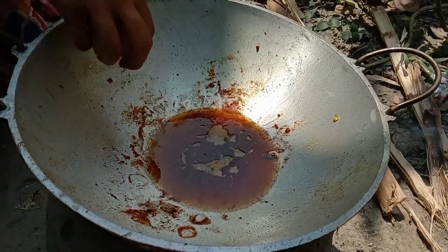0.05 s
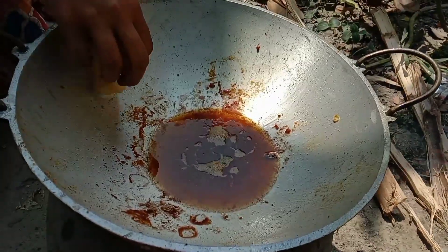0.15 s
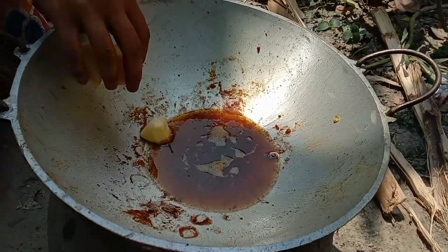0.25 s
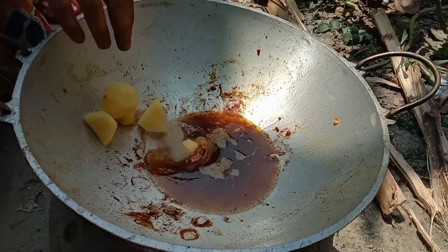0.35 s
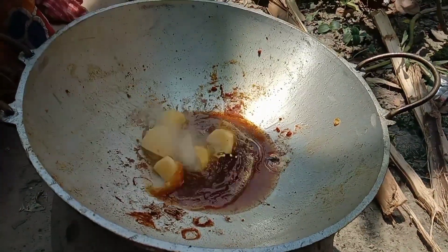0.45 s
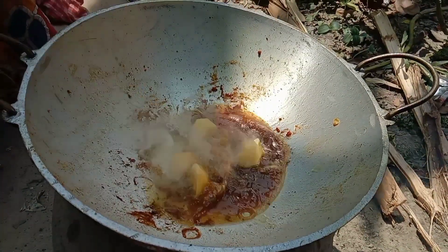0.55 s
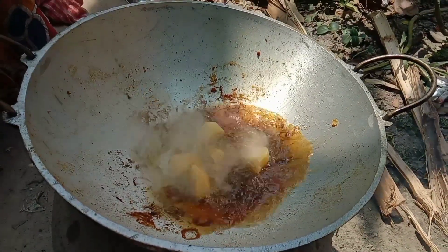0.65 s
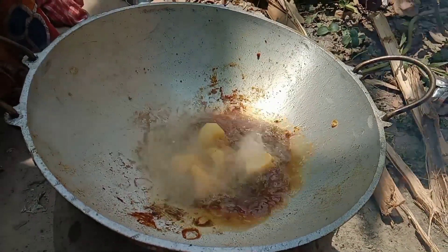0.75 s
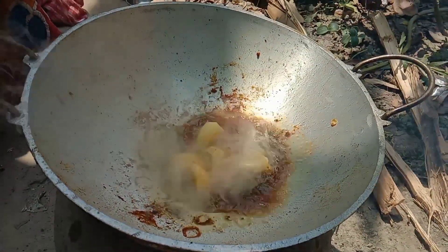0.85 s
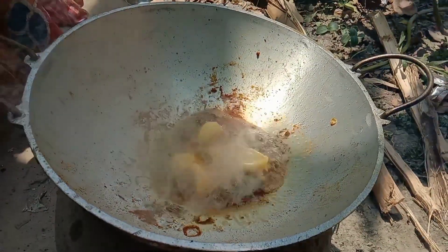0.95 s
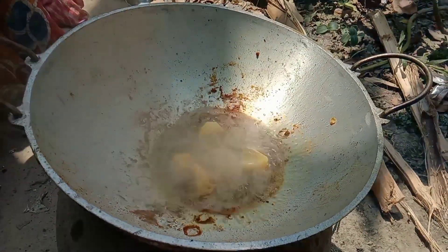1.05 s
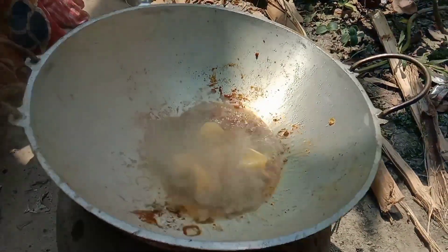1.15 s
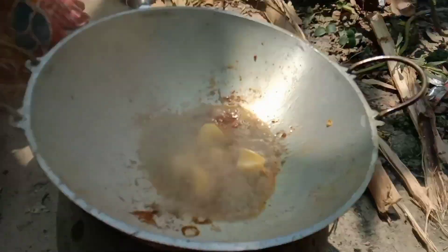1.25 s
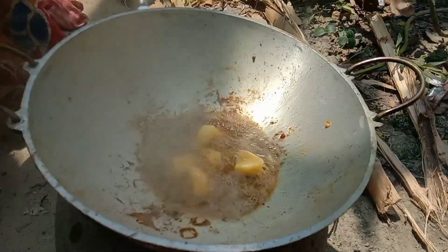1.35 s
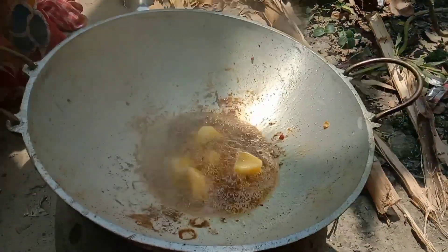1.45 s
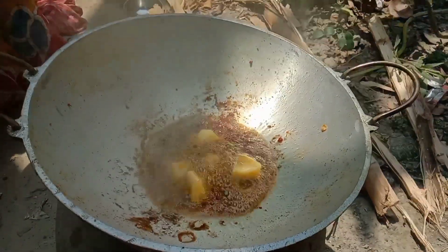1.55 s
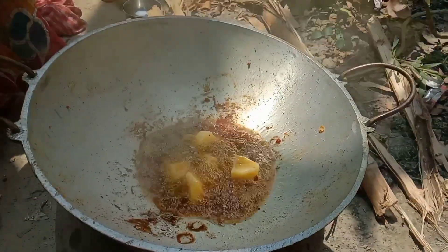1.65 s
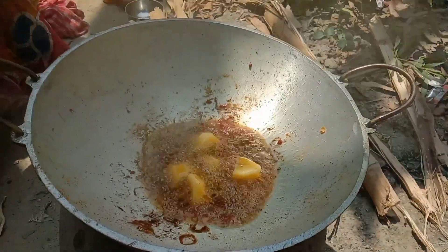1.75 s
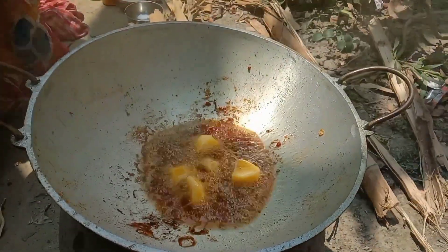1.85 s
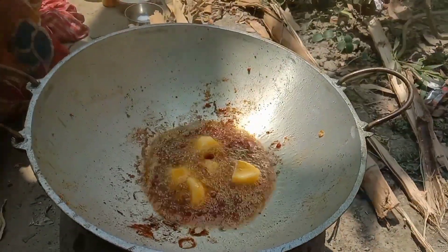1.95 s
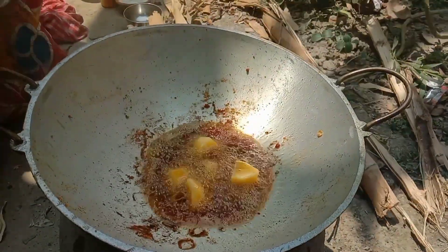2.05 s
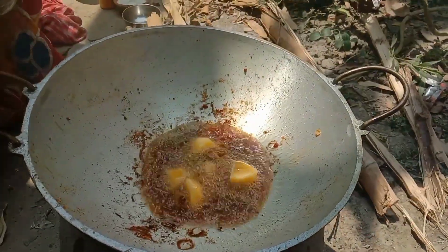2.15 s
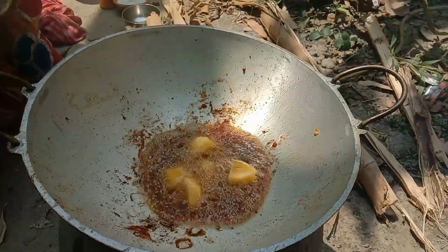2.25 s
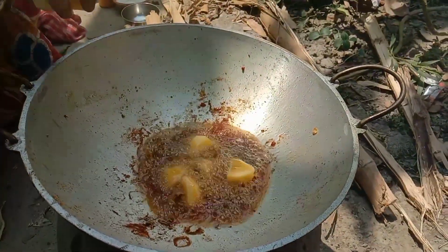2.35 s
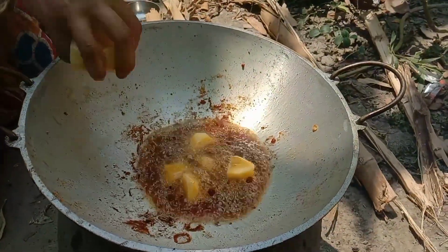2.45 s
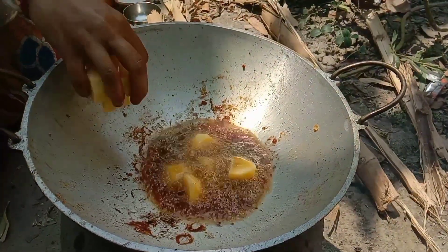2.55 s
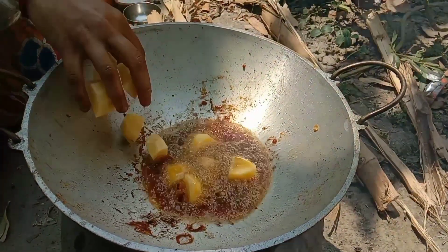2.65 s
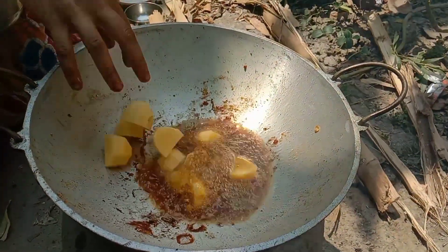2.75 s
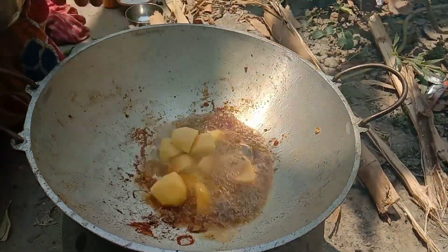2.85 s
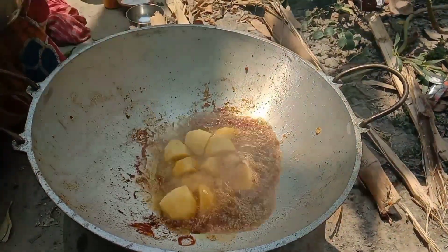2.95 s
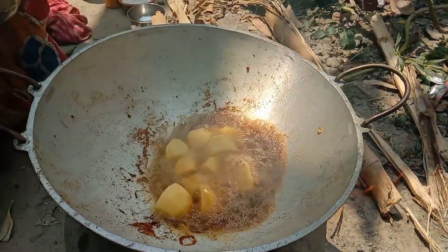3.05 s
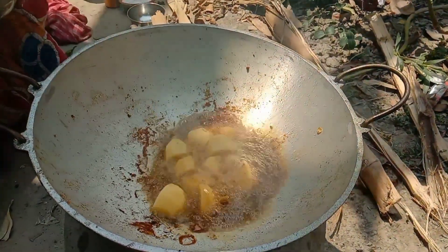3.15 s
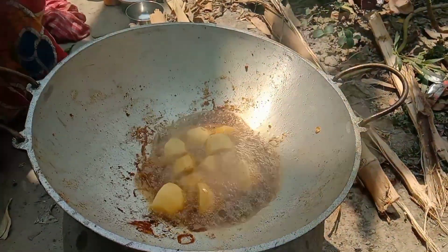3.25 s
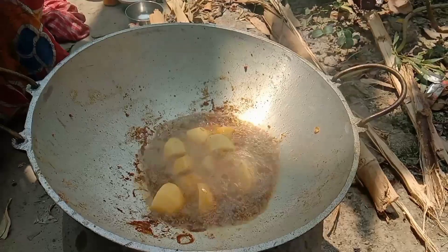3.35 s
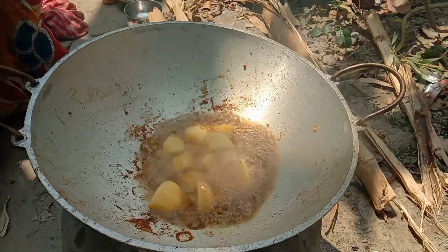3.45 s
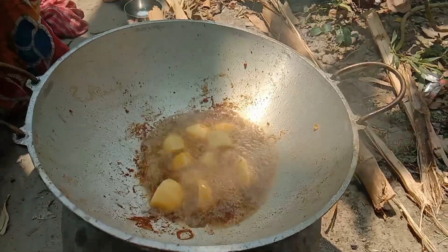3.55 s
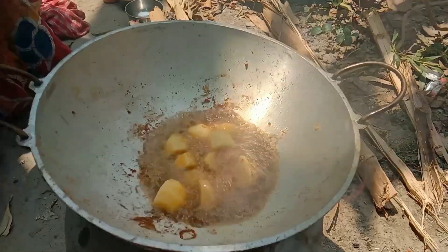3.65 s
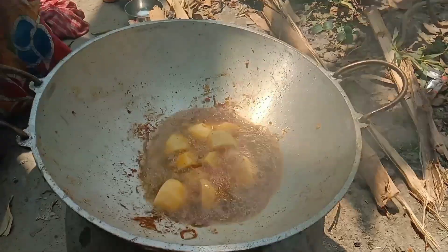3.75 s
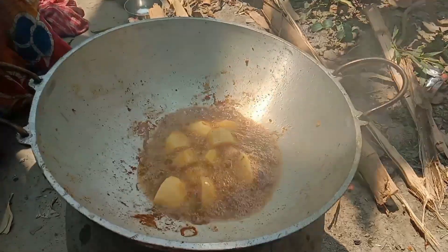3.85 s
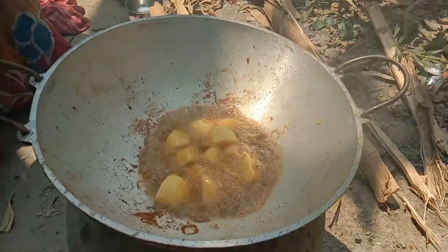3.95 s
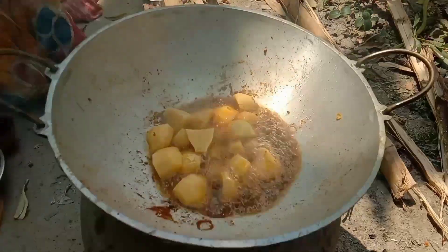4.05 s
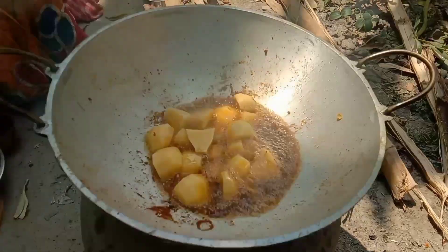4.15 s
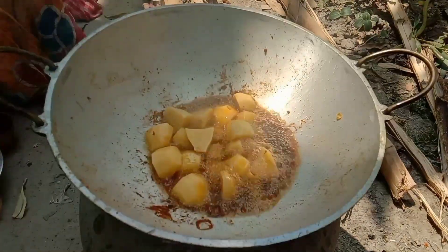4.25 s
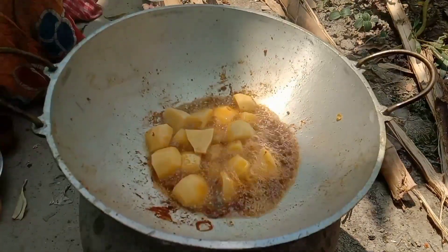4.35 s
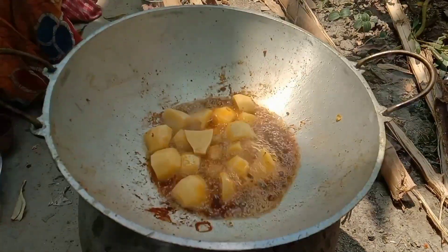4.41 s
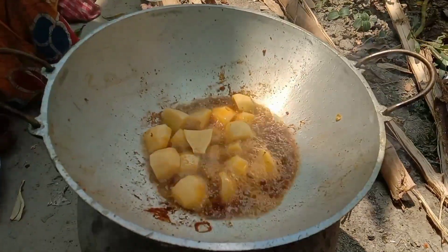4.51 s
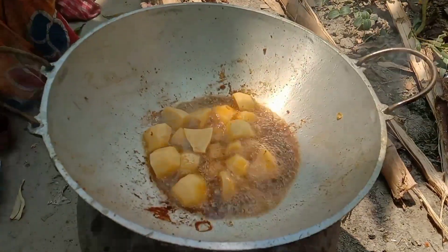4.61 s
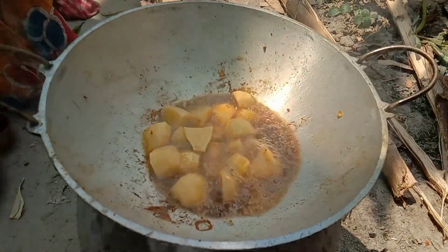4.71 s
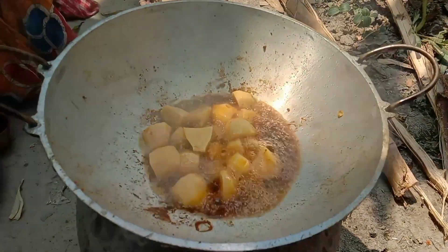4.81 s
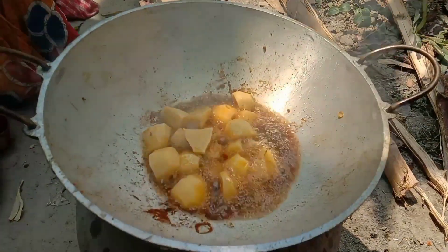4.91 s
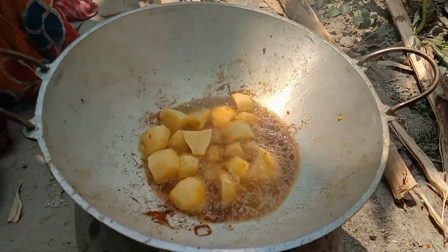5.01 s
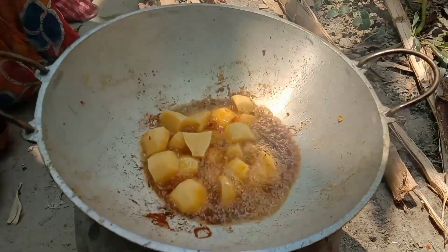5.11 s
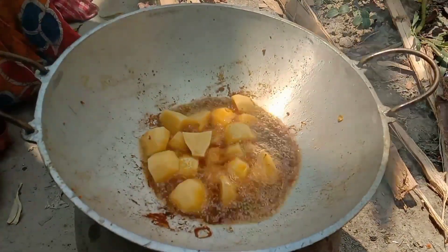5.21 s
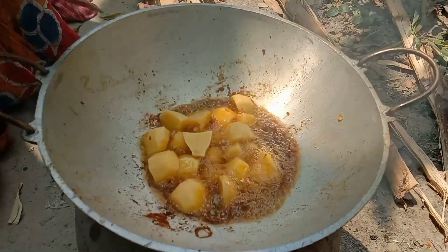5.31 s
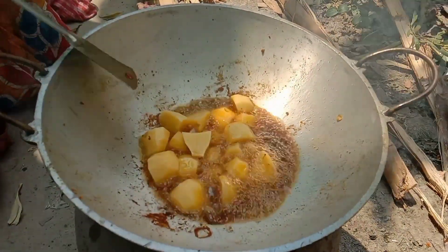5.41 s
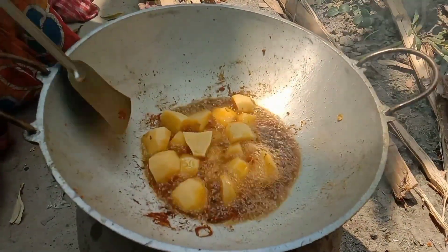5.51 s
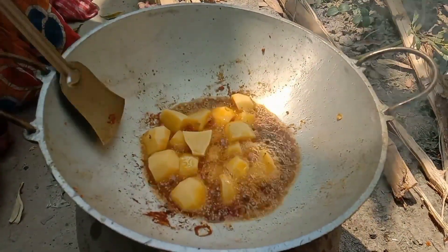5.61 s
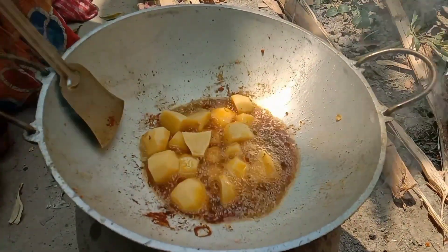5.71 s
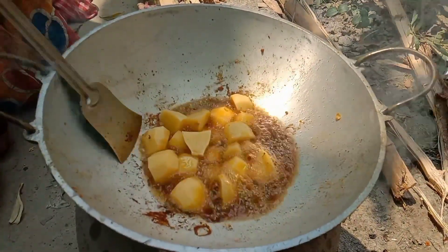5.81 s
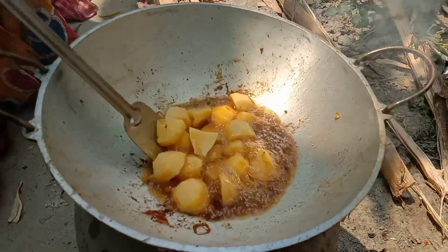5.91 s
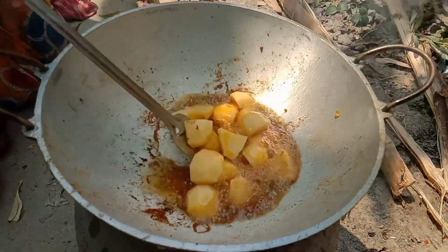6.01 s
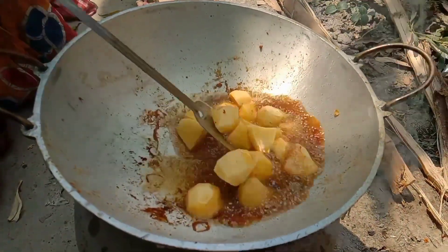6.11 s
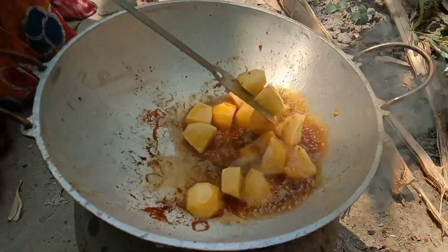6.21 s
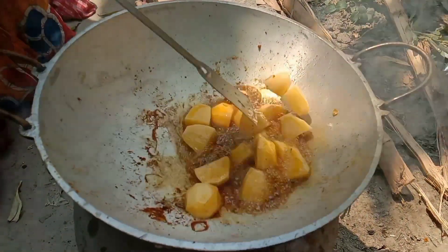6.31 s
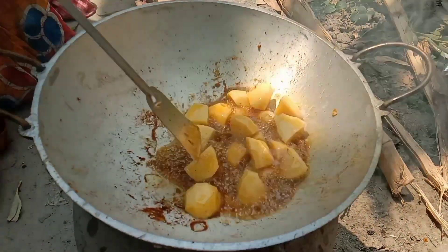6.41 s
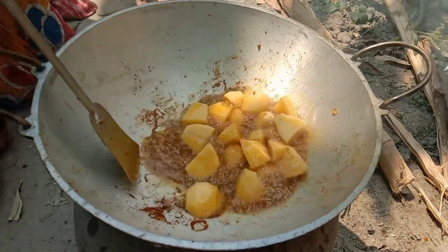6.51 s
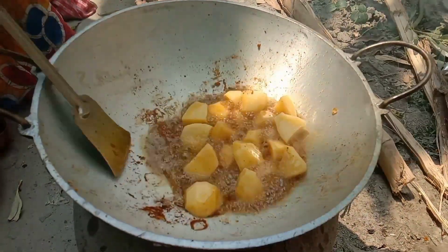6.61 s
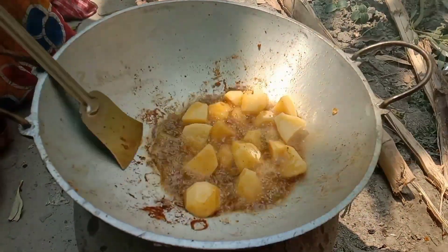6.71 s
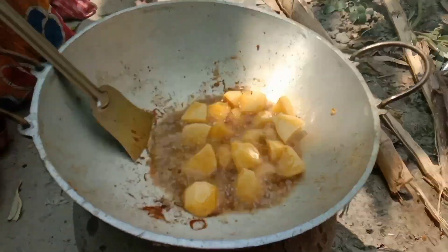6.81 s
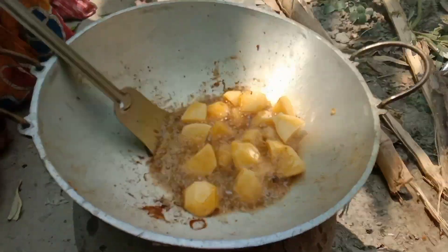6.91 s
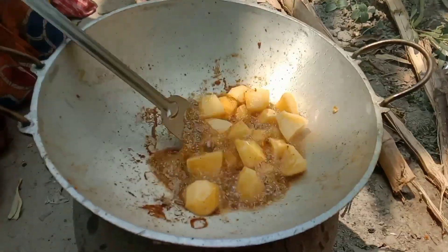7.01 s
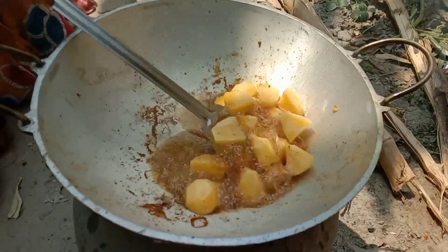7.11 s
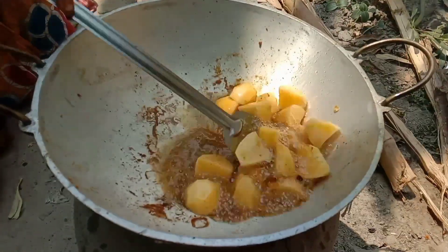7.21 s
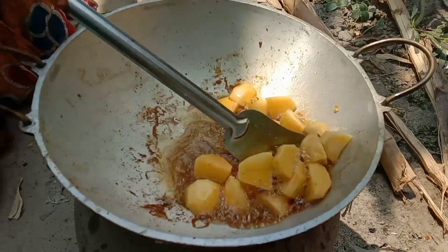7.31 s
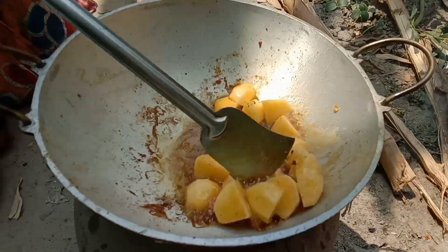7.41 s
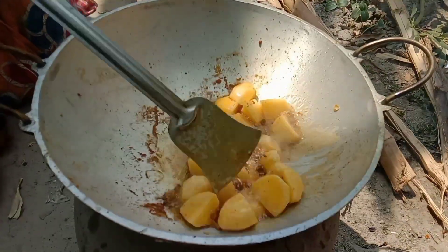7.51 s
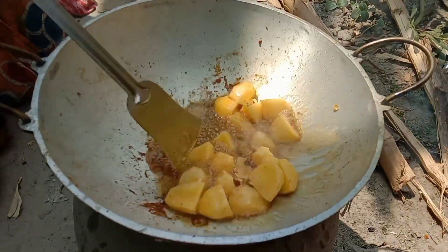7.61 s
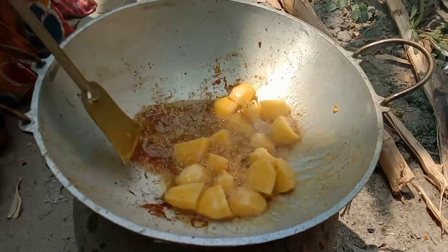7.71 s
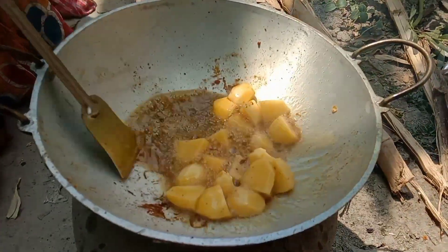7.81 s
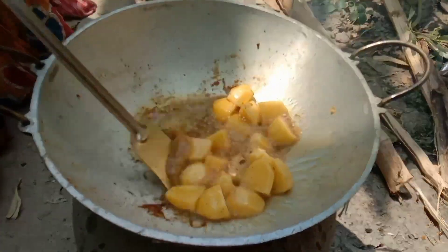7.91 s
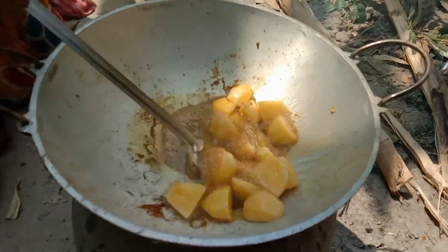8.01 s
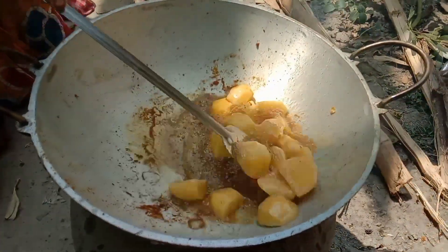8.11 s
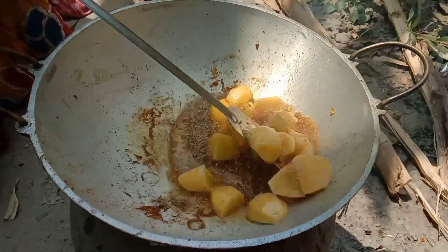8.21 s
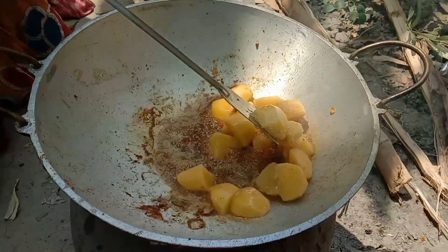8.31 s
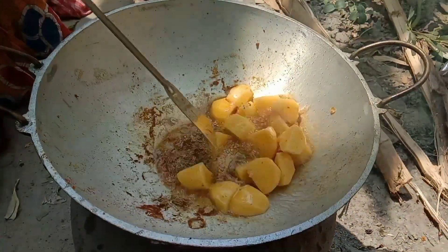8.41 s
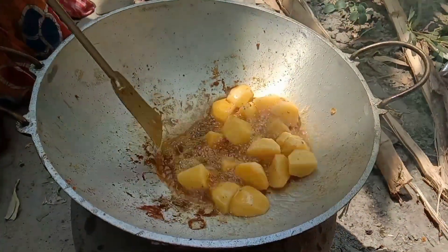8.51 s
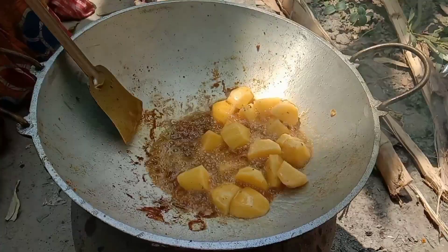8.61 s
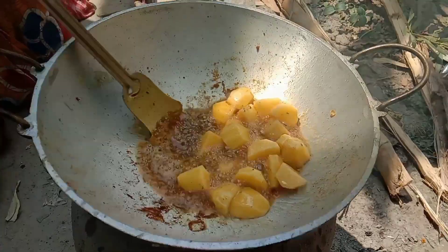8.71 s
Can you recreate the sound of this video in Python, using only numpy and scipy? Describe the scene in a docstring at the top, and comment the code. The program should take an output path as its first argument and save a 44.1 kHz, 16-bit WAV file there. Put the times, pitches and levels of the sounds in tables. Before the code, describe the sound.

Close mono pickup outdoors, quiet air and faint low rumble beneath. Near silence until 0.3 s, when potato chunks thud softly into hot oil and a bright, crackling sizzle swells, fading over the next two seconds with smaller flares and sharp spits near 0.9 and 1.1 s. At about 2.55 s a bird gives one short, hoarse squawk. A second handful lands at 2.75-2.9 s and frying surges again, with loud pops around 3.3 s. Two metallic clanks at 4.3 and 4.4 s accompany another surge, which gradually settles into coarser, plinking bubbles. From 5.57 s a spatula clangs on the wok several times, then shoves chunks with hollow thuds, short gritty rasps and scrapes around 6-7.2 and 8 s. Each turn raises fresh sizzling, strong from 6 s onward, with loud spits at 6.85, 7.3, 8.05 and 8.45 s before easing toward the end.

```python
"""Outdoors, at a wide metal wok: potato chunks drop by two handfuls into hot oil.
Clicks, noise and ringing bubbles, coloured by the bowl, crackle and spit; each flare of the oil fades.
A bird squawks once: reedy pulses through a throat filter, with a short noise echo.
A metal spatula clangs on the wok and then shoves the chunks: decaying modes, stick-slip clicks, rasps.
"""
import sys
import numpy as np
from scipy import signal
from scipy.fft import rfft, irfft
from scipy.io import wavfile

SR = 44100
rng = np.random.default_rng(int(sys.argv[2]) if len(sys.argv) > 2 else 0)


def store_wav(level_fs):
    """Save 16-bit WAV to argv[1]."""
    pcm = np.round(np.clip(np.atleast_2d(level_fs), -1, 1) * 32767)
    wavfile.write(sys.argv[1], SR, pcm.T.astype(np.int16))


N = 386316
TIME = np.arange(N) / SR

# Outdoor air spectrum. Each row: frequency in Hz, relative spectral level in dB.
AIR_SPECTRUM = [(18, -49), (30, -35), (59, 1.5), (288, -10.5), (448, -20), (978, -15), (1270, -11.5),
                (2770, -11), (4310, -26), (7060, -23.5), (15000, -52)]
# Low rumble spectrum of the wok on its stove. Each row: frequency in Hz, relative spectral level in dB.
STOVE_SPECTRUM = [(20, -12), (45, -19), (75, -17), (110, 1), (180, -6), (300, 6), (450, -14), (900, -31),
                  (3000, -61)]
# The bird's throat. Each row: frequency in Hz, relative level in dB.
THROAT_SPECTRUM = [(400, -26.5), (900, -26), (1300, -5), (1750, -10), (2250, 1), (2700, -1.5), (3200, -8),
                   (4200, -36), (6000, -23), (9000, -57)]
# Dull low bumps. Each row: start in seconds, peak level in dB.
BUMPS = [(0.129, -56), (1.228, -38), (3.546, -38), (4.309, -32.5), (4.426, -32)]
# Modes of the loaded wok on its stove. Each row: frequency in Hz, relative level in dB, T60 in seconds.
WOK_MODES = [(268, -24, 0.17), (295.6, -0.5, 0.21), (343, -2, 0.09), (408.2, 1, 0.16), (466, -8, 0.027),
             (543, 0.5, 0.014), (614, 1, 0.09)]
# Chunks landing on or shoved against the wok. Each row: start in seconds, peak level in dB, pitch in Hz.
THUDS = [(0.312, -38.5, 308), (0.432, -33, 374), (0.499, -35, 380), (2.756, -33.5, 368), (2.903, -28, 514),
         (2.921, -30, 294), (5.567, -21, 354), (5.676, -24, 354), (5.711, -27.5, 363), (5.779, -33.5, 365),
         (5.926, -32, 403), (6.04, -26, 432), (6.166, -25, 410), (6.53, -30, 295), (6.722, -33, 480),
         (6.84, -29, 409), (6.885, -28.5, 412), (6.928, -30.5, 284), (7.933, -33, 438), (8.259, -36, 300)]
# Chunks, later the spatula too, sliding over the wok.
# Each row: start in seconds, length before the fade in seconds, level before the wobble in dB.
SLIDES = [(0.414, 0.18, -51), (2.803, 0.21, -49), (5.693, 0.058, -49), (5.932, 0.22, -43),
          (6.49, 0.066, -44.5), (6.79, 0.15, -48.5), (6.98, 0.35, -42), (7.53, 0.17, -52.5),
          (8.02, 0.21, -43), (8.54, 0.14, -58)]
# Spatula edge biting into bare metal.
# Each row: start in seconds, length in seconds, RMS level in dB, pitch in Hz.
GRINDS = [(6.064, 0.057, -25, 1770), (6.117, 0.019, -24, 1650), (6.153, 0.028, -30, 1320),
          (7.164, 0.075, -29.5, 1240), (7.927, 0.13, -35, 2400), (8.091, 0.068, -32, 1670)]
# Spatula modes. Each row: frequency in Hz, relative level in dB, free T60 in seconds.
SPATULA_MODES = [(525, 1, 0.22), (875, -30, 0.11), (1054, -3.5, 0.55), (1160, -4, 0.3), (1585, -11, 0.6),
                 (1664, -2, 0.11), (2050, -8, .25), (2162, -6, 0.48), (2553, -1, 0.65), (2730, -22, .35),
                 (2800, -11, .2), (3208, -27, .25), (5240, -24, .25)]
# Spatula knocks. Each row: start in seconds, ring peak in dB, pitch favoured by the contact in Hz,
# share of the free T60 (ratio), clack peak in dB; scene() trims both levels.
CLANGS = [(4.3081, -23, 465, 2.8, -17.5), (4.428, -18.5, 1530, 0.84, -17), (5.567, -13.5, 1200, 0.75, -24),
          (5.672, -21, 2440, 2.3, -37.5), (5.683, -13, 1370, 0.48, -34), (6.1669, -30, 1100, 0.2, -16),
          (7.181, -18, 1046, 0.12, -41)]
# Dry clack of a metal contact. Each row: frequency in Hz, relative level in dB.
CLACK_SPECTRUM = [(50, -49), (110, -34), (220, -19), (450, 10.5), (750, -6.5), (1300, 11), (2000, 0),
                  (3000, 5), (4200, -28), (14000, -37)]
# Handle hum while the spatula swings free.
# One row: start in seconds, frequency in Hz, level before the trim in scene() in dB, T60 in seconds.
HANDLE_HUM = (4.5, 181, -53, 1.5)
# Water drops bursting in the oil.
# Each row: start in seconds, peak level in dB, cavity pitch in Hz, cavity T60 in seconds.
SPITS = [(0.433, -21.5, 5800, 0.019), (0.9218, -10, 1810, 0.011), (1.133, -19, 2900, 0.0063),
         (1.725, -30, 1960, 0.052), (2.7295, -25.5, 3080, .015), (3.2972, -11.5, 2740, .004),
         (3.319, -19.5, 2220, .03), (3.3545, -16.5, 2800, .012), (4.2637, -24, 2090, .025),
         (4.9764, -24, 2320, 0.0028), (5.929, -25, 2330, 0.017), (6.844, -10, 2830, 0.015),
         (7.283, -15.5, 2920, .007), (8.051, -17, 2470, 0.0071), (8.4552, -19, 1730, 0.034)]
# Slope of the frying sound. Each row: frequency in Hz, relative spectral level in dB.
FRY_SPECTRUM = [(250, -29.5), (500, -24.5), (800, -26.5), (1200, -11), (1900, 0), (3300, 1.5), (3900, -7),
                (5200, -5.5), (7200, -6), (9300, -10.5), (10500, -19.5), (12800, -21), (13900, -25.5),
                (14700, -4)]
# Peaks and notches of the air in the bowl. Each row: centre in Hz, Gaussian width in Hz, gain in dB.
BOWL_PEAKS = [(602, 41.6, 5), (950, 51, 2.5), (1279, 69.5, 18.5), (1700, 126, 10.5), (2000, 95, 0),
              (3340, 66, 3), (4312, 217, -7), (5260, 160, 2.5), (6190, 250, -4.5), (8060, 310, -6.2)]
# Oil flaring up: two handfuls, a fresh surge of frying at 4.2 s, each turn.
# Each row: start in seconds, rise in seconds, hold in seconds, fade in dB per second, then levels in dB
# of gurgle, bubbling, sizzle and fizz. REGISTERS scales the rise and fade and trims the levels.
FLARES = [(0.313, .29, .07, 9, -50.5, -33, -36.5, -38), (0.976, .15, .1, 17.5, -72, -50, -40.5, -42),
          (1.655, 0.039, 0.084, 21, -59, -50, -46, -49), (2.749, 0.18, .4, 7.5, -47.5, -33.5, -39, -41.5),
          (3.245, 0.042, .03, 122, -62, -31.5, -46, -50), (4.19, 0.12, 0.35, 4.5, -50.5, -34, -42, -46),
          (5.073, .05, 0.062, 1, -73, -43, -52.5, -63), (5.964, 0.12, .1, 11, -70, -33.5, -40, -45),
          (6.288, 0.059, 0.17, 8, -57, -33.5, -39.5, -42), (6.494, 0.14, .3, 10, -54.5, -29.5, -34.5, -41),
          (7.02, 0.052, 0.2, 70, -48.5, -31.5, -48, -55), (7.32, .07, 0.22, 25, -64, -33, -36.5, -39),
          (7.798, 0.044, 0.32, 9.5, -68, -33, -36.5, -41.5)]
# Bubble registers, large to small: gurgle, bubbling, sizzle, fizz; smaller ones rise sooner.
# Each row: share of flare rise time (ratio), share of flare fade rate (ratio), level trim in dB.
REGISTERS = [(1.16, 0.83, 3.5), (1.13, 1.07, -0.1), (0.65, 1.13, -0.56), (0.37, 1.1, 1.4)]
# Edges between the registers. Each entry: frequency in Hz.
REGISTER_EDGES_HZ = [330, 1080, 4250, 12600, 15900]

AIR_DB = -71
# rumble level at RMS fizz vigour, before its drift; exponent on that vigour
RUMBLE_DB, RUMBLE_EXPONENT = -64, 0.59
SQUAWK_S, SQUAWK_DB = 2.557, -36.5
SQUAWK_ATTACK_S, SQUAWK_HOLD_S, SQUAWK_RELEASE_S = 0.018, 0.059, 0.012
SQUAWK_TOP_HZ, CLIMB_S, CLIMB_HZ_PER_S = 452, 0.028, 760
SAG_HZ_PER_S, HOARSE_RAMP_S = 2100, 0.03
SLIDE_ATTACK_S, SLIDE_FADE_DB_PER_S, PRESSURE_WOBBLE_DB = 0.052, 126, 1.5
# large slow bubbles take over as the second handful cools the oil; dB against the fine bubbles
COOLING_START_S, COOLING_S, LARGE_HOT_DB, LARGE_COOLED_DB = 2.6, 2.3, -15.5, -4.5
CUTOFF_HZ = 15550


def from_db(db):
    """Decibels to gain."""
    return 10 ** (np.asarray(db) / 20)


def rms_one(x):
    """Scale to unit RMS."""
    return x / np.sqrt(np.mean(x ** 2) + 1e-20)


def peak_one(x):
    """Scale to unit peak."""
    return x / np.max(np.abs(x))


def add(out, start_s, sound):
    """Mix a sound in at start_s."""
    start = int(start_s * SR)
    out[start:start + len(sound)] += sound[:N - start]


def band(x, low_hz, high_hz, order=2):
    """Causal Butterworth band-pass."""
    edges_hz = [low_hz, min(high_hz, 0.48 * SR)]
    sos = signal.butter(order, edges_hz, "band", fs=SR, output="sos")
    return signal.sosfilt(sos, x + 1e-18)


def zone(x, low_hz, high_hz):
    """One register of a sound at unit RMS, band-passed without phase shift."""
    sos = signal.butter(5, [low_hz, high_hz], "band", fs=SR, output="sos")
    return rms_one(signal.sosfiltfilt(sos, x))


def coloured(x, points, peaks=()):
    """Minimum-phase filter from a spectrum with bell-shaped peaks and notches on it."""
    size = 4096
    hz = np.maximum(np.fft.rfftfreq(size, 1 / SR), 1)
    knots_hz, knots_db = np.transpose(points)
    db = np.interp(np.log(hz), np.log(knots_hz), knots_db)
    for centre_hz, width_hz, gain_db in peaks:
        db = db + gain_db * np.exp(-0.5 * ((hz - centre_hz) / width_hz) ** 2)
    # fold the cepstrum to its causal half
    cepstrum = irfft(np.log(from_db(db)))
    cepstrum[1:size // 2] *= 2
    cepstrum[size // 2 + 1:] = 0
    impulse = irfft(np.exp(rfft(cepstrum)))
    return signal.fftconvolve(x, impulse)[:len(x)]


def drift(knots_per_s):
    """Random wander in straight lines between knots, unit RMS."""
    knots = rng.standard_normal(int(N / SR * knots_per_s) + 2)
    return rms_one(np.interp(TIME * knots_per_s, np.arange(len(knots)), knots))


def clicks(per_s, spread_db):
    """Random clicks of either sign, sizes spread exponentially in dB; unit RMS."""
    sizes = from_db(spread_db * np.minimum(rng.exponential(1, N), 5.5))
    present = rng.random(N) < per_s / SR
    return rms_one(present * sizes * rng.choice([-1, 1], N))


def ring(x, hz, t60_s):
    """Two-pole mode that a unit click sets ringing at height about 1."""
    radius = from_db(-60 / (t60_s * SR))
    angle = 2 * np.pi * hz / SR
    return signal.lfilter([0, np.sin(angle)], [1, -2 * radius * np.cos(angle), radius ** 2], x + 1e-18)


def burst(t60_s, length_s):
    """Exponentially decaying noise."""
    t = TIME[:int(length_s * SR)]
    return rng.standard_normal(len(t)) * from_db(-60 * t / t60_s)


def swell(start_s, attack_s, hold_s, release_s):
    """Gain over time: linear attack, hold and linear release."""
    age = TIME - start_s
    release = 1 - (age - attack_s - hold_s) / release_s
    return np.clip(np.minimum(age / attack_s, release), 0, 1)


def vigour(index):
    """Gain over time of one bubble register: every flare rises, holds and fades, and powers add."""
    rise_share, fade_share, trim_db = REGISTERS[index]
    power = 1e-12
    for start_s, rise_s, hold_s, fade_db_per_s, *levels_db in FLARES:
        age = TIME - start_s
        rise = np.clip(age / (rise_s * rise_share), 0, 1)
        faded_db = fade_share * fade_db_per_s * np.maximum(age - rise_s - hold_s, 0)
        power = power + (rise * from_db(levels_db[index] - faded_db)) ** 2
    return from_db(trim_db) * np.sqrt(power)


def background():
    """Steady noise for outdoor air, and noise for the wok rumble that follows the fizz of the boil."""
    air = from_db(AIR_DB) * rms_one(coloured(rng.standard_normal(N), AIR_SPECTRUM))
    rumble = rms_one(coloured(rng.standard_normal(N), STOVE_SPECTRUM))
    rumble = rumble * from_db(RUMBLE_DB + 2.2 * drift(5.1))
    return air + rumble * rms_one(vigour(index=3)) ** RUMBLE_EXPONENT


def squawk(jitter=0.042, echo_t60_s=0.63, echo_db=-3):
    """Reedy pulses through a throat turn hoarse as the pitch sags; the yard scatters the call."""
    loudness = swell(SQUAWK_S, SQUAWK_ATTACK_S, SQUAWK_HOLD_S, SQUAWK_RELEASE_S)
    past_top_s = TIME - SQUAWK_S - CLIMB_S
    hoarse = np.interp(past_top_s, [0, HOARSE_RAMP_S], [0.2, 1.5])
    below_top_hz = np.maximum(-CLIMB_HZ_PER_S * past_top_s, SAG_HZ_PER_S * past_top_s)
    arch_hz = SQUAWK_TOP_HZ - below_top_hz * (loudness > 0)
    pitch_hz = arch_hz * (1 + jitter * hoarse * drift(600))
    sawtooth = signal.sawtooth(2 * np.pi * np.cumsum(pitch_hz) / SR)
    pulses = rms_one(np.diff(sawtooth, prepend=0))
    reed = (pulses + hoarse * rng.standard_normal(N)) / np.hypot(1, hoarse)
    call = from_db(SQUAWK_DB) * loudness * rms_one(coloured(reed, THROAT_SPECTRUM))
    yard = burst(echo_t60_s, length_s=0.5)
    echo = signal.fftconvolve(call, yard / np.linalg.norm(yard))[:N]
    return call + from_db(echo_db) * echo


def bumps():
    """Short dull knocks: band-passed decaying noise with no modes."""
    out = np.zeros(N)
    for start_s, peak_db in BUMPS:
        knock = band(burst(0.035, length_s=0.5), 105, 330, order=3)
        add(out, start_s, from_db(peak_db) * peak_one(knock))
    return out


def thuds(scatter_db=3, squash_t60_s=0.022, squash_db=-1, focus_db_per_octave2=9):
    """A soft chunk excites the wok modes near its own pitch, plus a brief noisy squash."""
    out, t = np.zeros(N), TIME[:SR // 2]
    for start_s, peak_db, pitch_hz in THUDS:
        scatter = rng.normal(0, scatter_db, len(WOK_MODES))
        body = 0
        for k, (hz, level_db, t60_s) in enumerate(WOK_MODES):
            weight_db = level_db + scatter[k] - focus_db_per_octave2 * np.log2(hz / pitch_hz) ** 2
            body = body + (-1) ** k * from_db(weight_db - 60 * t / t60_s) * np.sin(2 * np.pi * hz * t)
        squash = peak_one(band(burst(squash_t60_s, length_s=0.5), pitch_hz / 1.3, pitch_hz * 1.35))
        thud = band(peak_one(body) + from_db(squash_db) * squash, 202, 570, order=3)
        add(out, start_s, from_db(peak_db) * peak_one(thud))
    return out


def scraping(slips_per_s=350, slip_db=2.5, bites_per_s=900, rub_db=-2.0):
    """Stick-slip clicks ring the wok modes, chunks rub along, and the blade edge rasps where it bites."""
    slips = clicks(slips_per_s, slip_db)
    rumble = 0
    for k, (hz, level_db, t60_s) in enumerate(WOK_MODES):
        rumble = rumble + (-1) ** k * from_db(level_db) * ring(slips, hz, t60_s)
    rub = rms_one(band(clicks(slips_per_s, slip_db), 420, 797, order=3))
    friction = rms_one(band(rms_one(rumble) + from_db(rub_db) * rub, 147, 660))

    pressure = 0
    for start_s, length_s, level_db in SLIDES:
        age = TIME - start_s
        attack = np.clip(age / SLIDE_ATTACK_S, 0, 1)
        faded_db = SLIDE_FADE_DB_PER_S * np.maximum(age - length_s, 0)
        pressure = pressure + attack * from_db(level_db - faded_db)
    out = pressure * from_db(PRESSURE_WOBBLE_DB * drift(16)) * friction

    bites = clicks(bites_per_s, spread_db=-1.5)
    for start_s, length_s, level_db, hz in GRINDS:
        stroke = bites[int(start_s * SR):int((start_s + length_s) * SR)]
        rasp = band(band(stroke, hz / 1.066, hz * 1.05, order=1), 580, 4300)
        rasp = rasp * np.sqrt(np.hanning(len(rasp)))
        add(out, start_s, from_db(level_db) * rms_one(rasp))
    return out


def clangs(focus_db_per_octave2=7, clack_t60_s=0.12):
    """Each contact clacks, excites spatula modes near one pitch and damps the preceding ring."""
    out, t = np.zeros(N), TIME[:SR]
    for start_s, peak_db, centre_hz, freedom, clack_db in CLANGS:
        tone = 0
        for hz, level_db, t60_s in SPATULA_MODES:
            weight_db = level_db - focus_db_per_octave2 * np.log2(hz / centre_hz) ** 2 + rng.normal(0, 0.77)
            decay = from_db(weight_db - 60 * t / (t60_s * freedom))
            tone = tone + rng.choice([-1, 1]) * decay * np.sin(2 * np.pi * hz * t)
        tone = peak_one(band(tone, centre_hz / 2, centre_hz * 2))
        clack = peak_one(coloured(burst(clack_t60_s, length_s=1), CLACK_SPECTRUM))
        # earlier contacts drop to a quarter
        out *= np.interp(TIME, [start_s, start_s + 0.0065], [1, 0.25])
        add(out, start_s, from_db(peak_db) * tone + from_db(clack_db) * clack)
    start_s, hz, level_db, t60_s = HANDLE_HUM
    add(out, start_s, from_db(level_db - 60 * t / t60_s) * np.sin(2 * np.pi * hz * t))
    return out


def spits(crack_db=-6, crack_db_per_octave=17):
    """Each drop bursts with a noise crack and a ringing steam cavity; higher pitch, more crack."""
    out, t = np.zeros(N), TIME[:SR // 10]
    for start_s, peak_db, hz, t60_s in SPITS:
        onset = 1 - np.exp(-t * hz / 2)
        cavity = np.sin(2 * np.pi * hz * t) * from_db(-60 * t / t60_s) * onset
        crack = coloured(burst(t60_s * 1.6, length_s=0.2), FRY_SPECTRUM, BOWL_PEAKS)
        crack = peak_one(crack)[:len(t)]
        crack_gain = from_db(crack_db + crack_db_per_octave * np.log2(hz / 2000))
        add(out, start_s, from_db(peak_db) * peak_one(peak_one(cavity) + crack_gain * crack))
    return out


def bubbles(per_s=1300, size_db=2.0, hiss_db=-5, echo_share=0.52):
    """Tiny bubbles burst in swarms: clicks and hiss per size band, each with its own echo off the wok."""
    edges_hz = np.geomspace(180, 19000, num=23)
    swarm, out = drift(25), 0
    for low_hz, high_hz in zip(edges_hz, edges_hz[1:]):
        bursts = clicks(per_s, size_db) + from_db(hiss_db) * rng.standard_normal(N)
        delay = int(rng.uniform(0.001, 0.004) * SR)
        bursts = rms_one(bursts + echo_share * np.roll(bursts, delay))
        flutter_db = 0.6 * swarm + 1.7 * drift(40)
        out = out + band(bursts, low_hz, high_hz) * from_db(flutter_db)
    return rms_one(out)


def plinks(per_s, size_db, cycles, low_hz, high_hz):
    """Single bubbles, each ringing with a T60 of some cycles at its own pitch; per_s is per pitch."""
    pitches_hz = np.geomspace(low_hz, high_hz, num=48) * rng.uniform(0.98, 1.02, 48)
    count = int(per_s * N / SR)
    out = np.zeros(N)
    for hz in pitches_hz:
        born = np.zeros(N)
        when, size, sign = rng.random((count, 3)).T
        heights = from_db(size_db * np.minimum(-np.log(size), 3.5))
        born[(when * N).astype(int)] = heights * np.sign(sign - 0.5)
        out += np.sqrt(hz) * rms_one(ring(born, hz, cycles / hz))
    return rms_one(out)


def frying(snaps_per_s=380, snap_size_db=3.0, snap_db=-8.0, ping_db=-2.0, pop_db=-5):
    """Fine bubbles, sharp snaps and larger ringing bubbles, coloured by the bowl and driven by flares."""
    splutter = burst(0.005, length_s=0.03)
    snaps = rms_one(signal.fftconvolve(clicks(snaps_per_s, snap_size_db), splutter)[:N])
    pings = plinks(per_s=16, size_db=3, cycles=170, low_hz=2000, high_hz=12500)
    pops = plinks(per_s=3.5, size_db=2.9, cycles=14, low_hz=1400, high_hz=7500)
    large_db = np.interp(TIME - COOLING_START_S, [0, COOLING_S], [LARGE_HOT_DB, LARGE_COOLED_DB])
    large = from_db(large_db) * (from_db(ping_db) * pings + from_db(pop_db) * pops)
    mix = bubbles() + from_db(snap_db) * snaps + large
    crackle = coloured(mix, FRY_SPECTRUM, BOWL_PEAKS)
    # big bubbles gurgle, small ones sizzle and fizz
    out = np.zeros(N)
    for k, (low_hz, high_hz) in enumerate(zip(REGISTER_EDGES_HZ, REGISTER_EDGES_HZ[1:])):
        out += vigour(k) * zone(crackle, low_hz, high_hz)
    return out


def scene():
    """Sum of all layers, as one channel."""
    handling = bumps() + thuds() + scraping() + from_db(-1) * clangs()
    oil = spits() + frying()
    return (background() + squawk() + handling + oil)[None]


def record(dry):
    """Steep elliptic low-pass."""
    sos = signal.ellip(16, 0.2, 90, CUTOFF_HZ, fs=SR, output="sos")
    return signal.sosfilt(sos, dry)


dry = scene()
out = record(dry)
store_wav(out)
```